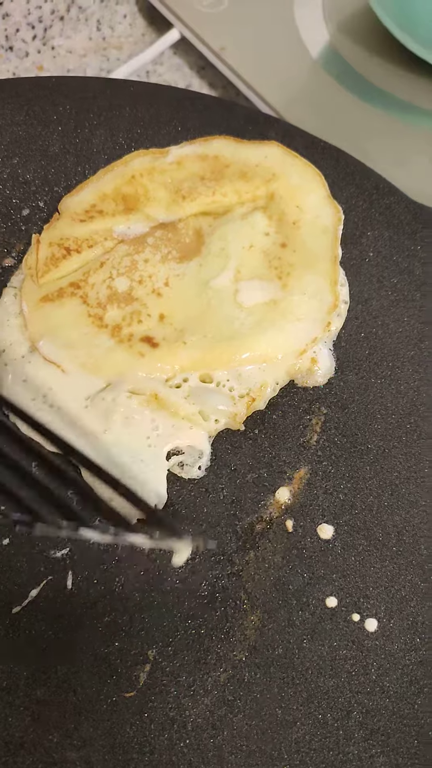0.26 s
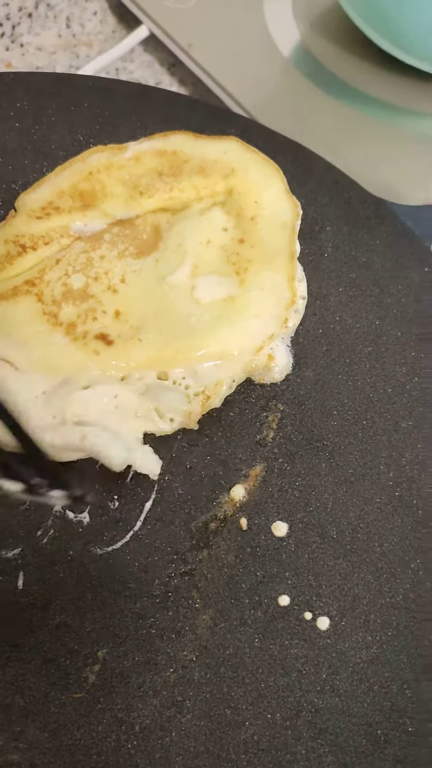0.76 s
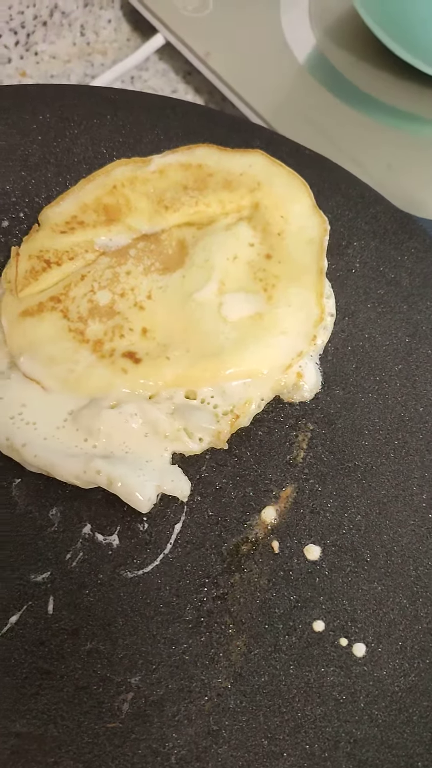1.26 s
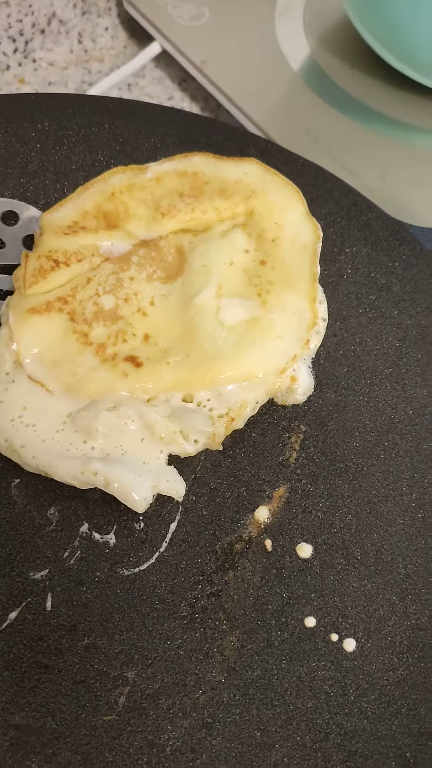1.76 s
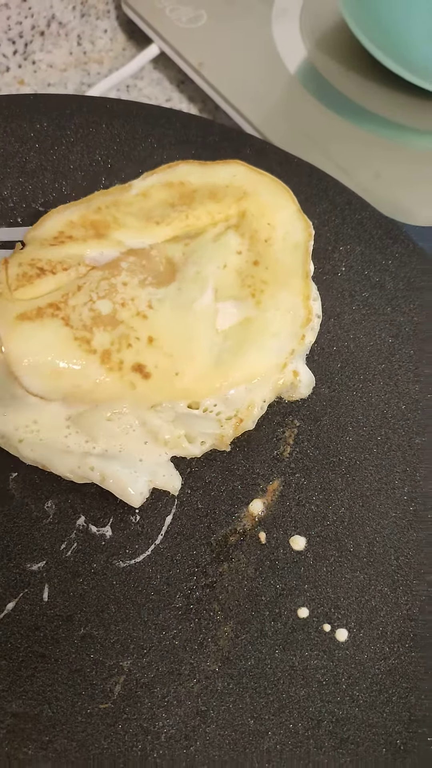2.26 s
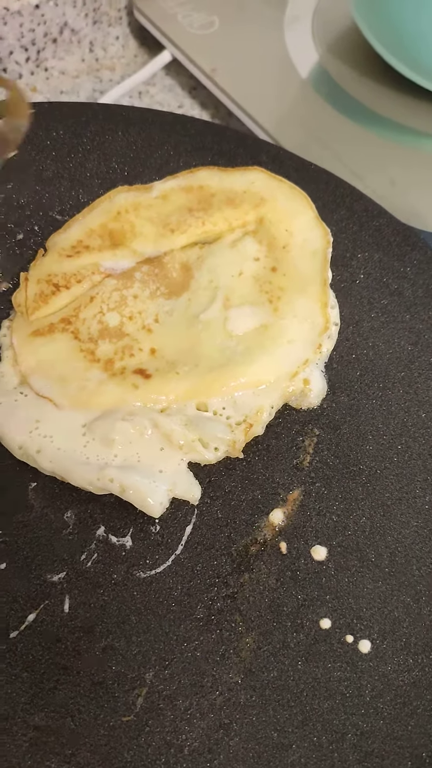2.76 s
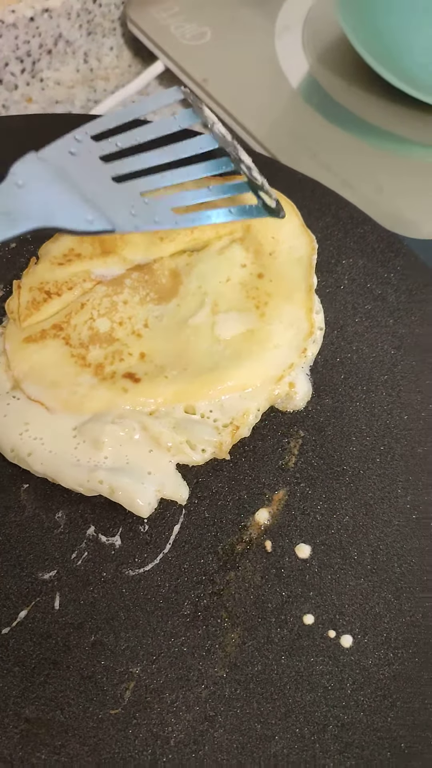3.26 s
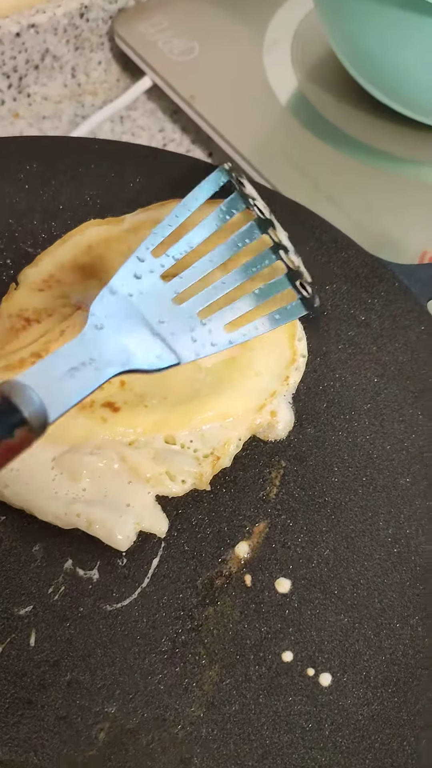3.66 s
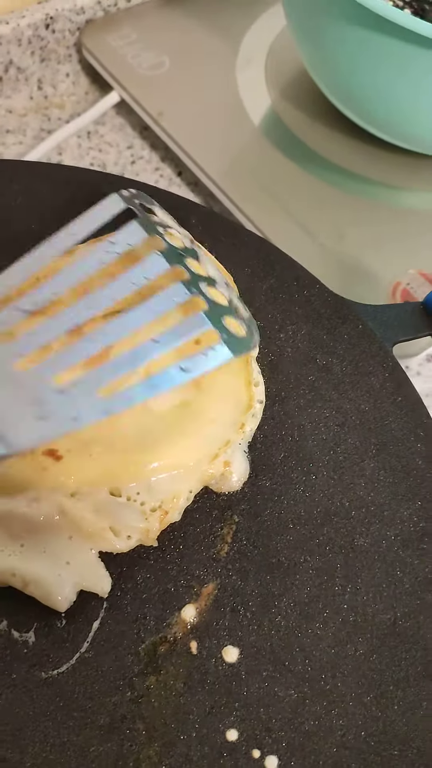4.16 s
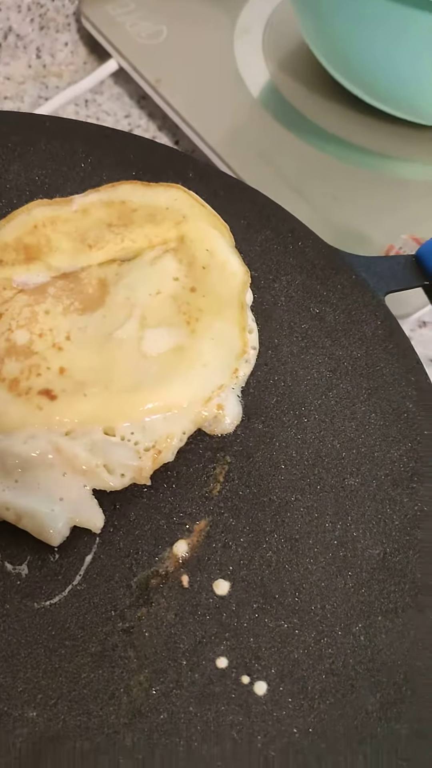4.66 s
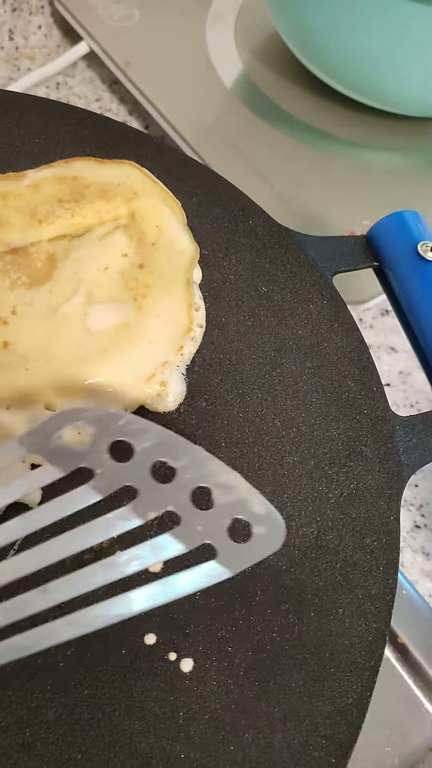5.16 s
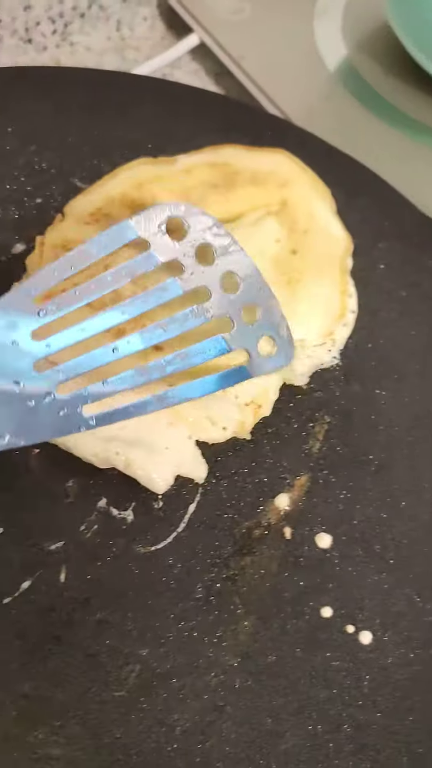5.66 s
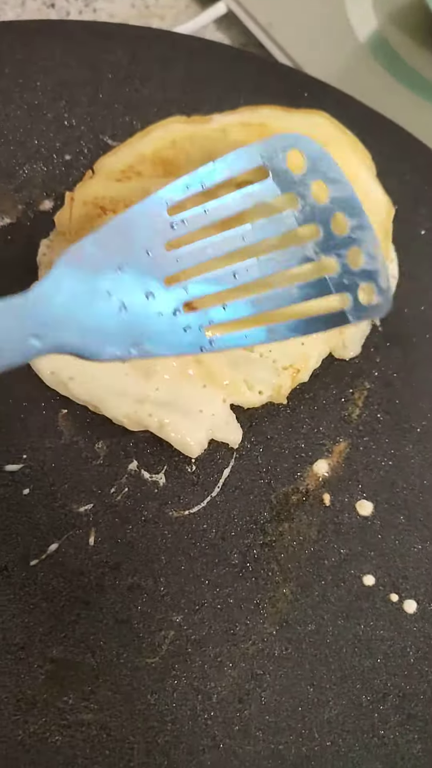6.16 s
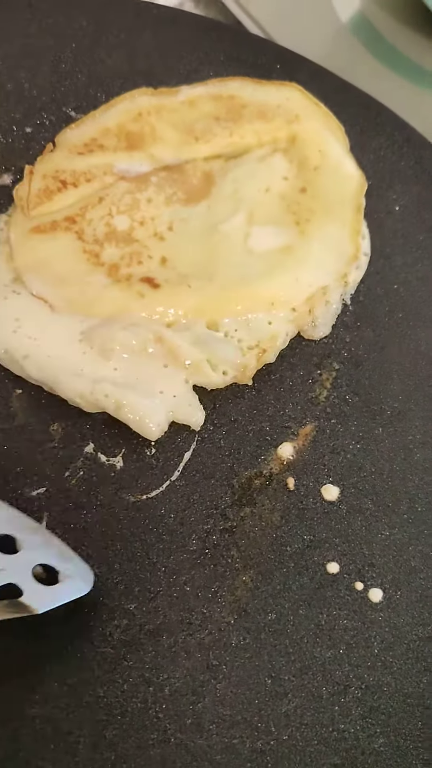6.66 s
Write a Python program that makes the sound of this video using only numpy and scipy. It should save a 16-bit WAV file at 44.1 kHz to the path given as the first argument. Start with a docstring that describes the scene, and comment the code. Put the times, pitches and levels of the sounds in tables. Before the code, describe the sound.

Close up in a small kitchen, batter sizzles softly and fat spits in tiny snaps throughout. Early on, a metal spatula clatters briefly and makes several short scrapes along the pan, each followed by a little swell of hiss. Two loud ringing knocks come just past the middle, then a cluster of light clicks with a rasp, and a last scrape. The sizzle slowly thins over a faint low room rumble.

```python
"""A small kitchen, close to a nonstick pan in which a pancake fries.
Steam bubbles burst under the batter, their many impulses merging into a hiss, and fat spits.
A slotted steel spatula is pushed under the edge, knocks twice on the pan, then taps and scrapes
with its rim: impact and stick-slip friction excite the damped modes of blade and pan.
A low rumble lies beneath."""
import sys
import numpy as np
from scipy import signal
from scipy.fft import rfft, irfft, next_fast_len
from scipy.io import wavfile

SR = 44100
rng = np.random.default_rng(int(sys.argv[2]) if len(sys.argv) > 2 else 0)


def transcribe(u):
    """Save the signal u as a 16-bit wav file named by the first command-line argument.

    u: samples, shape (n,) or (channels, n), limited to [-1, 1]; the rate is SR.
    q: integer samples, one column per channel.
    """
    v = np.clip(np.atleast_2d(u).T, -1, 1)
    q = np.round(v * 32767).astype(np.int16)
    wavfile.write(sys.argv[1], SR, q)


N = 304279
TIME = np.arange(N) / SR
AGE = TIME[:SR * 5 // 8]   # time since an excitation [s]


# Spectrum of the bursting steam bubbles: (frequency [Hz], spectral level [dB])
SIZZLE_SPECTRUM = [(150, -40), (500, -20), (1000, -7), (1500, -5.5), (2400, -2.5), (3500, -0.5),
                   (4800, -4.5), (5800, -1.5), (7600, 3.5), (8700, -6.5), (10500, -10.5), (12500, -6),
                   (14200, -9), (15000, -64)]

def sizzle():
    """Shot noise: steam bubbles burst at random round the batter; the smallest merge into a hiss."""
    crackle = 0
    for spot in range(6):
        # each spot reaches the two ears by paths of its own
        burst = rng.standard_normal((2, len(AGE))) * (decay(.003) + from_db(-12) * decay(.025))
        onsets = impulses(per_s=55, spread_db=4.6)
        crackle = crackle + signal.oaconvolve(onsets[None], burst[:, :SR // 60], axes=1)[:, :N]
    hiss = unit_rms(rng.standard_normal((2, N)))
    crackle_ratio = from_db(-4 + .68 * TIME)   # single bursts stand out more as the batter dries
    frying = coloured((crackle_ratio * unit_rms(crackle) + hiss) / np.hypot(crackle_ratio, 1),
                      SIZZLE_SPECTRUM)
    fizz = signal.sosfiltfilt(signal.butter(6, 8500, "high", fs=SR, output="sos"), frying)
    sizzle_gain, fizz_gain = frying_gains()
    return sizzle_gain * unit_rms(frying - fizz) + fizz_gain * unit_rms(fizz)


# Wet batter meets the hot pan: (peak time [s], rise time [s], sizzle level [dB], fizz level [dB])
FLARES = [(0.02, .05, -52.5, -54.5), (0.64, 0.11, -50, -49), (0.92, 0.12, -58.5, -56),
          (1.54, 0.17, -55.5, -57), (2.04, 0.15, -53.5, -58), (2.76, .13, -54.5, -58),
          (3.26, 0.086, -57, -60), (6.88, 0.047, -54.5, -48.5)]

def frying_gains(fall_s=.21):
    """Incoherent sources add in power: flares ride on frying that fades as the underside dries."""
    power = from_db([-54 - 1.5 * TIME, -54.5 - 2.5 * TIME]) ** 2   # sizzle, then the finer fizz
    for peak_s, rise_s, *levels_db in FLARES:
        exponent = np.where(TIME < peak_s, ((peak_s - TIME) / rise_s) ** 2 / 2, (TIME - peak_s) / fall_s)
        power = power + np.outer(from_db(levels_db), np.exp(-exponent)) ** 2
    return np.sqrt(power)


# Spectra of a bubble's bright snap and duller plop: (frequency [Hz], spectral level [dB])
SNAP_SPECTRUM = [(400, -10), (1500, -16), (3500, -10), (7500, 1), (9500, -6.5), (13000, -0.5), (15000, -8)]
PLOP_SPECTRUM = [(300, -23), (1100, 1), (2500, 4), (4000, 2), (7000, -4), (15000, -38)]

def spit(level_db, plop_db, balance_db):
    """A brief pulse is broadband: a bubble snaps in milliseconds; pan and walls return a faint trail."""
    size = SR // 8
    envelope = (decay(.0024) + from_db(-10) * decay(.034) + from_db(-26) * decay(.18))[:size]
    snap = (noise(SNAP_SPECTRUM, size) + from_db(plop_db) * noise(PLOP_SPECTRUM, size)) * envelope
    snap /= np.linalg.norm(snap, axis=1, keepdims=True)
    return from_db(level_db + 12.5) * ear_gains(balance_db) * snap


# The loudest spits of fat: (time [s], relative level [dB], plop re snap [dB], left-right [dB])
LOUD_SPITS = [(0.1502, -32, -27, -2), (0.8976, -27.5, -39, -10), (0.9373, -31, -25, -10),
              (0.9543, -31, -26, -5), (0.9811, -28.5, -16, -12), (1.0061, -28, -16, -7),
              (1.2, -26.5, -25, -15), (1.207, -28.5, -13, -5), (1.6586, -26, -30, -6),
              (2.0902, -29, -17, -2), (2.2935, -32, -22, -2), (2.7662, -30, -20, 0), (2.8874, -28, -12, -4),
              (2.9447, -29, -10, -2), (3.0903, -33, -8, -3), (3.1389, -30.5, -7, -1),
              (3.2274, -31.5, -10, -5), (3.3268, -32, -17, -5), (3.3756, -31.5, -22, -6),
              (3.437, -30, -8, -3.5), (3.817, -33, 3, -6), (3.917, -26.5, -24, -6), (3.9608, -28, -31, -10),
              (4.2703, -32.5, -6, -6), (4.337, -27.5, -29, -8.5), (4.3471, -33, -8, -6),
              (4.4067, -30, -32, -2), (4.4994, -30.5, -8, -2), (4.822, -30.5, -26, -3),
              (4.9307, -33, -0.5, -4), (5.1741, -34, -4, -3), (5.238, -32, -15, -1),
              (5.2696, -32.5, -6, -6), (5.881, -34, -7, -3), (6.1654, -35.5, -11, -3.5),
              (6.3186, -32, -8, -5.5), (6.5177, -37, -22, -1), (6.688, -35.5, -35, -5)]

def spits(small_per_s=8):
    """A random point process scatters small spits among the loud; they weaken as the batter dries."""
    out = np.zeros((2, N))
    for time_s, level_db, plop_db, balance_db in LOUD_SPITS:
        add(out, time_s + .001, spit(level_db, plop_db, balance_db))
    for when, smallness, place in rng.random((int(small_per_s * N / SR), 3)):
        time_s = when * N / SR
        level_db = -31.5 - 8.5 * np.sqrt(smallness) - .4 * time_s
        add(out, time_s, spit(level_db, plop_db=-14, balance_db=-3 + 4 * (2 * place - 1)))
    return out


# Resolved modes of pan and blade: (frequency [Hz], level [dB], T60 [s], left-right [dB])
PAN_RING_MODES = [(200, -13.5, 0.82, 3.5), (323, -20.5, 0.48, -13), (356.6, -7.5, 0.28, 0),
                  (387.5, -18.5, 0.39, -7.5), (508.8, -5, 0.16, 7)]
PAN_FLOOR_MODES = [(539, -17, 0.13, 6), (654, -10, 0.073, 8.1), (685, -2, 0.032, 8.9), (771.5, -8, 0.12, 9),
                   (1028, -7.5, 0.041, 5.2)]
SLAP_MODES = [(1057, -15.5, 0.094, -1), (1353, -22, 0.088, -1), (1736, -28, 0.085, -12),
              (1970, 4, 0.0082, -20), (1903, -11, 0.13, -13), (2170, -31, 0.064, -12),
              (2470, -25.5, 0.23, -6), (3208, -20, .1, -16), (4670, -11.5, 0.029, -16)]
PRESSED_MODES = [(2168, -1, .055, -12), (2260, -9, .05, -9), (2360, -9, .05, -8), (2480, -15, .07, -8),
                 (2810, -14, .11, -6), (2995, -13, .12, -6)]
RIM_MODES = [(2720, -4.5, 0.076, -17), (3000, -27, 0.062, -6), (3210, -5.5, .12, -16),
             (3280, -12, 0.081, 0), (3885, -9, 0.19, -9), (3920, -11, 0.12, -8), (4510, -15, .1, -1),
             (4716, -4.5, 0.088, -22), (4790, -14, 0.071, -10), (5050, -16, 0.074, -2),
             (5470, -14, 0.078, -7), (5650, -3.5, 0.077, -19), (6400, -20, 0.072, -5),
             (6650, -10, 0.095, -7), (6780, -13, .1, -4), (7350, -13, 0.12, -6), (7720, -9, 0.11, -7),
             (9020, -18.5, .11, 5)]
# Their clatter, modes too dense and brief to resolve: (frequency [Hz], spectral level [dB])
RING_CLATTER = [(70, -12), (170, -10), (270, -16), (360, 4), (520, -14), (700, -7), (1500, -30.5)]
FLOOR_CLATTER = [(100, -42), (350, -13.5), (560, -7), (780, 1), (1020, -9.5), (1250, -18), (2200, -2.5),
                 (5000, -42.5)]
SLAP_CLATTER = [(100, -16), (500, -5), (1050, 7), (1450, -7), (1800, -25), (2200, 5), (2800, -22),
                (4700, -5.5), (9000, -19)]
PRESSED_CLATTER = [(100, -59), (1300, -60), (1550, -17), (1850, -1), (2250, 12), (2600, -2.5), (3000, -1),
                   (3500, -33), (6000, -38), (14000, -30)]
RIM_CLATTER = [(100, -45), (700, -17), (1400, 0), (2000, -5.5), (2700, 4.5), (4400, 0.5), (6000, -1),
               (7700, 0.5), (8600, -8), (10000, -10.5), (13000, -8.5), (15000, -47)]

def resonators():
    """Impulse responses: the pan's slow ring and its floor; the blade slapped, pressed and on its rim."""
    ring = response(PAN_RING_MODES, RING_CLATTER, clatter_db=-10.5, t60=.017, room_db=-5, room_t60=.43)
    floor = response(PAN_FLOOR_MODES, FLOOR_CLATTER, clatter_db=1.5, t60=.014, room_db=-18, room_t60=.21)
    slap = response(SLAP_MODES, SLAP_CLATTER, clatter_db=-9.5, t60=.021, room_db=-15, room_t60=.32)
    pressed = response(PRESSED_MODES, PRESSED_CLATTER, clatter_db=-6, t60=.044, room_db=-17, room_t60=.32)
    rim = response(RIM_MODES, RIM_CLATTER, clatter_db=-4, t60=.086, room_db=-11, room_t60=.34)
    return ring, floor, slap, pressed, rim


# Spatula blows: (time [s], force level [dB], free blade level [dB], kind of contact)
BLOWS = [(0.4646, -27, -44, "jab"), (0.529, -33, -58, "judder"), (0.5375, -25.5, -60, "judder"),
         (0.5455, -27.5, -57, "judder"), (0.561, -34, -41.5, "judder"), (2.469, -41.5, -81, "tip"),
         (3.7251, -18, -35, "knock"), (4.0616, -14.5, -33.5, "knock"), (5.431, -36, -65, "tip"),
         (5.577, -41.5, -60, "rim"), (5.604, -49, -56, "tip"), (5.634, -38.5, -42, "rim"),
         (5.666, -37, -60, "knock"), (5.9524, -41, -52, "rim"), (6.2054, -35.5, -56, "rim"),
         (6.7656, -35, -75, "cushioned")]
# Coupling by kind of contact: (pan ring [dB], pan floor [dB], slap [dB], pressed blade [dB], rim [dB])
COUPLING = {"jab": (-14, -6, -17, 1.5, -18), "judder": (-25, -7.5, -19, 2, -27),
            "knock": (-17.5, -13, 0.5, -11, -16), "tip": (-7.5, -4.5, -3, -8, 1),
            "rim": (-10, -10.5, -12, -4, 0.5), "cushioned": (-18, -23, -27, 1.5, -15.5)}
# Mode of the blade clear of the pan: (frequency [Hz], level [dB], T60 [s], left-right [dB])
FREE_BLADE_MODE = [(1908, 0, 0.63, -15)]

def spatula_blows():
    """Impact excitation: each blow shares its force among the resonators, and the free blade rings on."""
    out = np.zeros((2, N))
    parts, free_ring = resonators(), damped_modes(FREE_BLADE_MODE)
    for time_s, force_db, free_db, contact in BLOWS:
        hit = sum(from_db(force_db + db) * part() for db, part in zip(COUPLING[contact], parts))
        add(out, time_s, hit + from_db(free_db) * free_ring)
    return out


# Flat blade under the pancake: (start [s], duration [s], blade [dB], pan floor [dB], pan ring [dB])
PUSHES = [(-0.03, 0.12, -46.5, -46.5, -56.5), (0.46, .16, -43, -52, -58), (1.266, 0.15, -63, -68, -59.5),
          (1.359, .25, -48, -58.5, -56.5), (1.631, .17, -61.5, -66, -65), (1.792, .33, -59, -64.5, -63.5),
          (2.475, .11, -60, -55.5, -58.5), (2.561, .085, -46, -54, -64), (2.634, 0.075, -43, -58, -61),
          (5.108, .11, -67, -70, -68), (6.819, 0.13, -45.5, -54, -62)]
# The blade's rim drawn across the pan: (start [s], duration [s], friction level [dB])
RIM_STROKE = (5.535, 0.15, -37)

def spatula_scrapes():
    """Stick-slip friction: steel catches and slips on the coating, driving the modes of blade and pan."""
    ring, floor, slap, pressed, rim = resonators()
    on_blade, on_floor, on_ring = sum(np.outer(from_db(levels_db), pressure(start, duration))
                                      for start, duration, *levels_db in PUSHES)
    start, duration, friction_db = RIM_STROKE
    stroke = from_db(friction_db) * pressure(start, duration)
    slips = impulses(per_s=2500, spread_db=3.5)
    rasp_clicks = np.array([impulses(per_s=2900, spread_db=.5) for ear in range(2)])
    rasp = coloured(rasp_clicks, RIM_CLATTER)   # heard straight from the contact
    return (rubbed(ring, slips * (on_ring + from_db(-15) * stroke))
            + rubbed(floor, slips * (on_floor + from_db(-11.5) * stroke))
            + rubbed(pressed, slips * on_blade)
            + rubbed(slap, slips * from_db(-9.5) * stroke)
            + rubbed(rim, slips * (from_db(-3) * stroke + from_db(-13) * on_blade))
            + rasp * (from_db(-5) * stroke + from_db(-4) * on_blade))


def pressure(start, duration, rise_share=.61):
    """Normal force of a stroke: the hand presses harder and harder, then lets go."""
    return np.interp((TIME - start) / duration, [0, rise_share, 1], [0, 1, 0]) ** .89


def rubbed(part, friction):
    """Forced vibration: friction clicks are convolved with a part's unit-energy impulse response."""
    blow = part()
    return signal.oaconvolve(friction[None], blow / np.linalg.norm(blow.mean(0)), axes=1)[:, :N]


def response(modes, clatter, clatter_db, t60, room_db, room_t60):
    """Superposition: each strike gives the same clear modes, with new clatter and its reverberation."""
    attack = 1 - decay(.0035)
    clear = damped_modes(modes)
    envelope = from_db(clatter_db) * np.hypot(decay(t60), from_db(room_db) * decay(room_t60))
    return lambda: attack * (clear + envelope * noise(clatter, len(AGE)))


def damped_modes(modes):
    """Free vibration: a sum of decaying sines, each with its own place between the ears."""
    return sum(ear_gains(balance_db) * from_db(db) * decay(t60) * np.sin(2 * np.pi * hz * AGE)
               for hz, db, t60, balance_db in modes)


# Background of the kitchen: (frequency [Hz], spectral level [dB])
ROOM_SPECTRUM = [(12, -10.5), (22, 3.5), (31, -16), (42, -3.5), (60, -15), (78, -19), (110, -17.5),
                 (200, -18.5), (280, -27.5), (360, -23), (450, -28.5), (800, -24.5), (1300, -29.5),
                 (3000, -37)]

def room(wavers_per_s=4.03):
    """Ambient noise: steady air over a low rumble whose amplitude wavers and slowly sinks."""
    air = noise(ROOM_SPECTRUM, N)
    rumble = signal.sosfiltfilt(signal.butter(2, 75, fs=SR, output="sos"), air)
    waver_db = np.interp(TIME * wavers_per_s, np.arange(100), rng.standard_normal(100))
    rumble_gain = from_db(-54.5 - .5 * TIME + waver_db)
    return rumble_gain * unit_rms(rumble) + from_db(-65) * unit_rms(air - rumble)


# Interaural level difference: (frequency [Hz], left-right [dB])
EAR_BALANCE = [(60, 0), (350, -2.5), (700, 2.5), (1300, 1), (2200, -6), (4400, -3.5), (8000, -4.5),
               (14000, -6.5)]
# Interaural coherence: (frequency [Hz], correlation [0 to 1])
EAR_COHERENCE = [(60, 0.89), (300, 0.64), (700, 0.44), (1400, 0.31), (3100, 0), (6800, 0.03),
                 (15000, 0.028)]

def coloured(pair, spectrum):
    """Spectral shaping: two independent white signals gain a colour and a place between the ears."""
    size = next_fast_len(pair.shape[1], True)
    hz = np.arange(size // 2 + 1) * SR / size
    mid, side = rfft(pair, size)
    coherence, balance_db = at_hz(EAR_COHERENCE, hz), at_hz(EAR_BALANCE, hz)
    sign = np.array([[1], [-1]])
    ears = np.sqrt(1 + coherence) * mid + sign * np.sqrt(1 - coherence) * side
    gain = from_db(at_hz(spectrum, hz) + sign * balance_db / 2)
    return unit_rms(irfft(ears * gain, size)[:, :pair.shape[1]])


def noise(spectrum, size):
    """Stereo Gaussian noise with a given spectrum."""
    return coloured(rng.standard_normal((2, size)), spectrum)


def impulses(per_s, spread_db):
    """A Poisson train of clicks, many small and a few large; rms 1."""
    rank = np.minimum(rng.exponential(1, N), 4)
    clicks = from_db(spread_db * rank) * rng.choice([-1, 1], N) * (rng.random(N) < per_s / SR)
    return clicks / np.std(clicks)


def decay(t60):
    """Exponential damping: a fall of 60 dB in t60 seconds."""
    return np.exp(-np.log(1000) * AGE / t60)


def ear_gains(balance_db):
    """A level difference as left and right gains with mean 1."""
    pair = from_db(np.array([[balance_db], [-balance_db]]) / 2)
    return pair / pair.mean()


def from_db(db):
    """Level to amplitude ratio."""
    return 10 ** (np.asarray(db) / 20)


def unit_rms(pair):
    """Scale a stereo pair so that its centre has rms 1."""
    return pair / np.std(pair.mean(0))


def at_hz(points, hz):
    """Interpolate a table on a log-frequency axis."""
    table_hz, value = np.transpose(points)
    return np.interp(np.log(hz + 1), np.log(table_hz), value)


def add(out, time_s, sound):
    """Superpose a sound at a given time."""
    i = max(round(time_s * SR), 0)
    out[:, i:i + sound.shape[1]] += sound[:, :N - i]


def scene():
    """Spatula, frying and room superpose; the thin pan is a poor radiator of bass."""
    bass_cut = signal.butter(4, 165, "high", fs=SR, output="sos")
    spatula = signal.sosfilt(bass_cut, spatula_blows() + spatula_scrapes())
    return sizzle() + spits() + spatula + room()


def record(dry, cutoff_hz=14500):
    """Band limiting: a steep low-pass removes the highest treble."""
    return signal.sosfilt(signal.ellip(10, .2, 80, cutoff_hz, fs=SR, output="sos"), dry)


dry = scene()
out = record(dry)
transcribe(out)
```